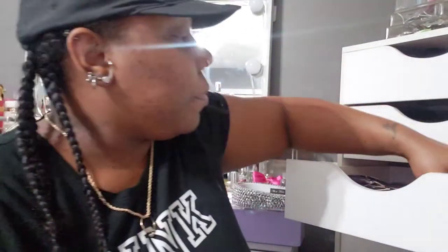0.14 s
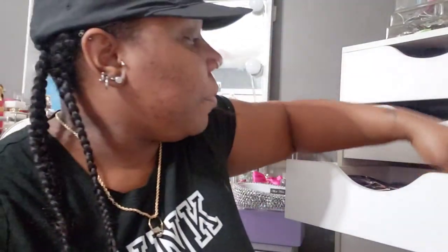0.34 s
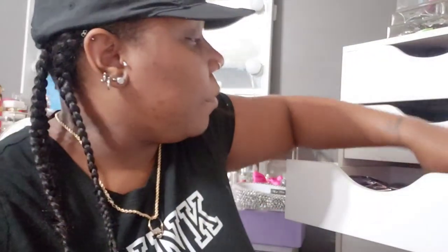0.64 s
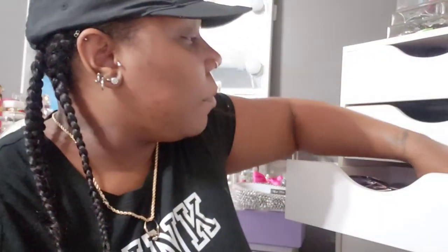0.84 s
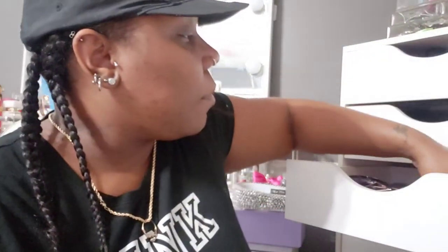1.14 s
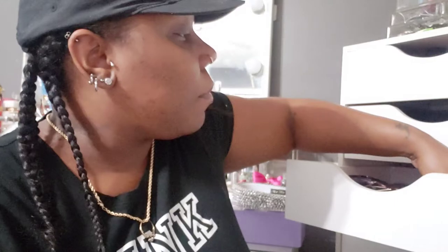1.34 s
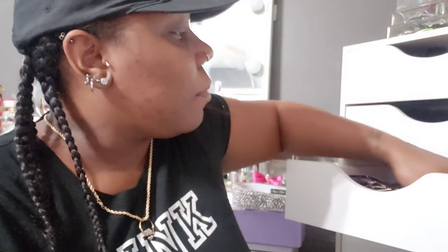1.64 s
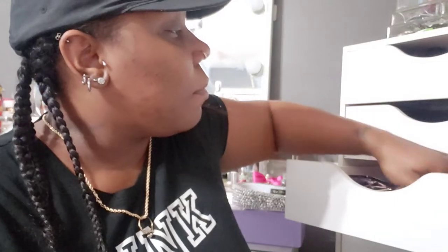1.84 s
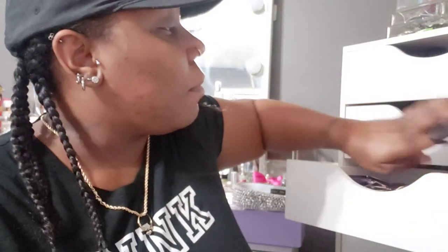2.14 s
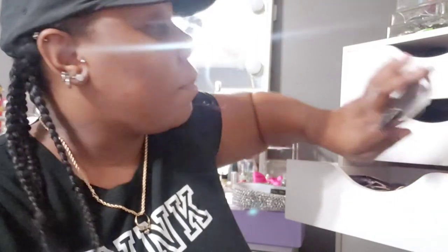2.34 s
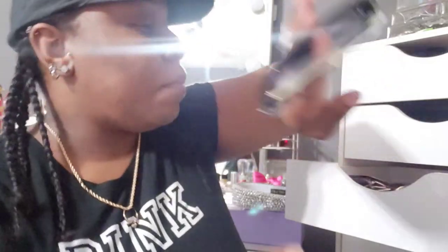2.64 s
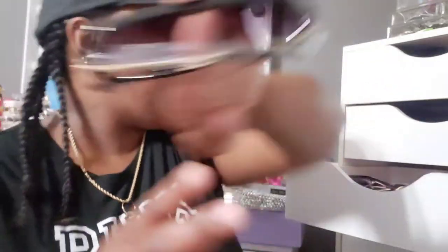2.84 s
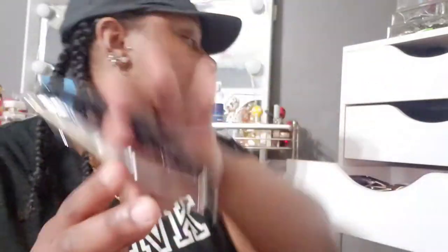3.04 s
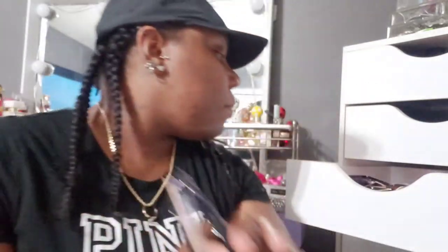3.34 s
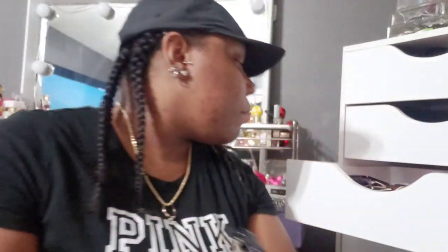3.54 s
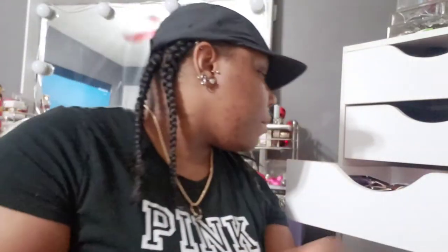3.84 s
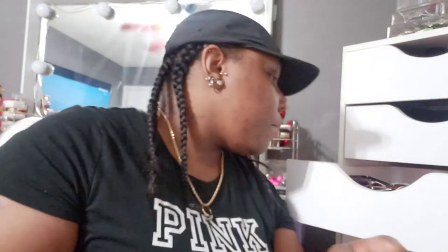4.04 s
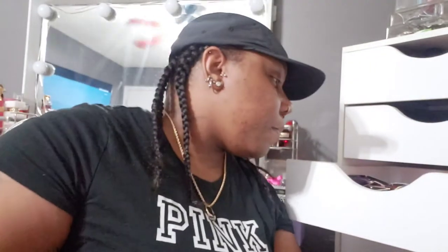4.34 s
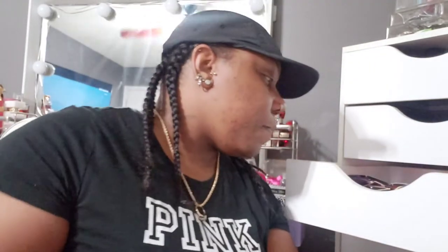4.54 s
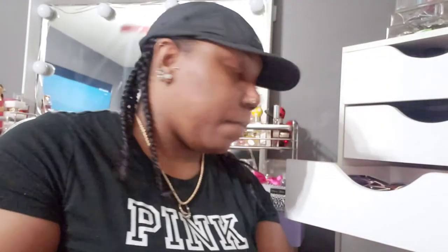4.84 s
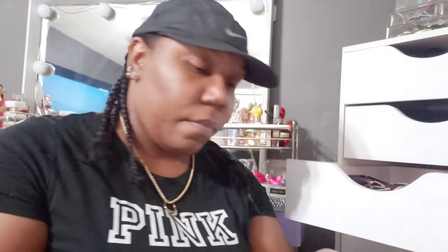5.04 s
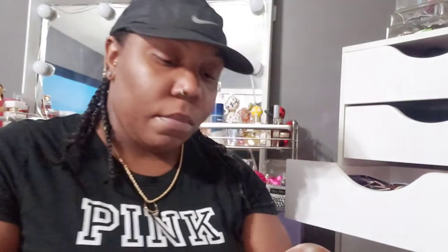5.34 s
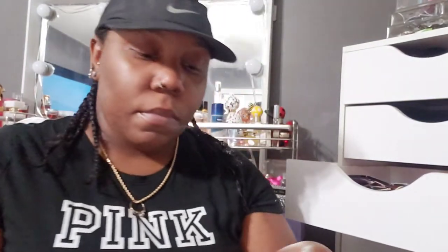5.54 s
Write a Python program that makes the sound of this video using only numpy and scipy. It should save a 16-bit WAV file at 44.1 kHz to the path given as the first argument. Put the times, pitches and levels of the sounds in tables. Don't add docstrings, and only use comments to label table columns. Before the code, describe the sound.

A hand rummages through plastic sunglasses in a hollow drawer, clattering and booming, then thin plastic wrap crackles close by over faint fan noise.

```python
import sys
import numpy as np
from scipy import signal
from scipy.io import wavfile

SR = 44100
rng = np.random.default_rng(int(sys.argv[2]) if len(sys.argv) > 2 else 0)


def generate_wav(signal):
    frames = np.transpose(np.atleast_2d(signal))
    scaled = np.clip(frames, -1, 1) * 32767
    pcm = np.round(scaled).astype(np.int16)
    wavfile.write(sys.argv[1], SR, pcm)


def voltage_ratio(decibels):
    exponent = np.asarray(decibels, float) / 20
    return 10 ** exponent


N = 250047


# start in seconds, frame click in dB,
# drawer boom in dB, mode struck most in Hz. First, lenses striking edge on.
LENS_KNOCKS = [(0.4339, -22.5, -22, 367), (0.4629, -47, -31.5, 393), (0.5449, -44, -41, 660),
               (1.0836, -47, -46.5, 1200), (1.465, -43.5, -35.5, 1180), (1.482, -35.5, -37, 356),
               (1.5164, -44.5, -40, 514), (1.7197, -56, -33.5, 750), (1.9049, -29.5, -30, 387),
               (2.1427, -28, -29, 1170), (2.3965, -81, -48.5, 890), (1.039, -51, -33, 1245),
               (1.064, -61, -29.5, 650), (0.441, -44, -31, 1245), (0.477, -42, -34, 380)]
TUMBLES = [(0.3206, -36, -35.5, 666), (0.3403, -31.5, -41, 684), (0.3544, -24.5, -27.5, 1220),
           (0.4206, -22, -23, 1270), (0.4276, -37, -48, 1370), (0.5142, -30.5, -37, 414),
           (1.0031, -36.5, -34.5, 370), (1.0203, -24.5, -30.5, 344), (1.2044, -49.5, -43.5, 665),
           (1.2753, -45, -39, 635), (1.2838, -33, -38, 445), (1.2984, -41, -34, 1300),
           (1.9144, -35.5, -31, 645), (1.9312, -28, -34.5, 367), (2.0582, -44, -38.5, 930)]
BUMPS = [(0.1547, -54.5, -52, 1390), (0.2327, -30.5, -25, 620), (0.2322, -44, -30.5, 1300),
         (1.108, -58, -50, 380), (1.309, -58, -43, 436), (0.363, -32.5, -40, 1340),
         (0.9086, -57, -43.5, 420), (0.9306, -45, -45, 1200), (0.9888, -43, -47, 1230),
         (1.0629, -35, -33.5, 1220), (1.1697, -38, -41.5, 706), (1.262, -37, -36.5, 1300),
         (1.6294, -44, -55, 557), (1.6876, -42.5, -44, 1180), (1.7107, -33, -42, 1360),
         (1.7951, -46.5, -45.5, 710), (2.0316, -37.5, -36.5, 445), (2.0374, -37, -47, 378)]
TAPS = [
    (1.368, -55, -66, 650),
    (1.3742, -58, -64, 650),
    (1.2, -58, -60, 1260),
    (1.5, -48, -41, 650),
    (1.085, -53.5, -60, 1260),
    (1.293, -54, -40, 1260),
    (1.723, -53.5, -46, 715),
    (0.4358, -40, -50, 1260),
]
# lens tick over frame click in dB, rattle in seconds, rise in seconds.
LENS_KIND = (-3, 0.0055, 0.0017)
TUMBLE_KIND = (-14, 0.0079, 0.0017)
BUMP_KIND = (-21, 0.0084, 0.0021)
TAP_KIND = (8.7, 0.0027, 0.0004)


def knocks():
    kinds = (LENS_KNOCKS, LENS_KIND), (TUMBLES, TUMBLE_KIND), (BUMPS, BUMP_KIND), (TAPS, TAP_KIND)
    return sorted(row + kind for rows, kind in kinds for row in rows)


def knock_shape(rattle_s, rise_s):
    t = np.arange(5000) / SR
    return np.exp(-t / rattle_s) * (1 - np.exp(-t / rise_s))


# pitch in Hz, width in Hz, level in dB.
DRAWER = [(200, 45, -12), (275, 60, -9), (382, 40, 1), (440, 50, -10), (650, 50, -1), (715, 55, -8),
          (900, 90, -5), (1094, 100, -8), (1262, 110, 0), (1430, 130, -8), (1740, 140, -10)]
# start in seconds, level in dB, pitch in Hz.
THUMPS = [
    (0.238, -44, 150),
    (0.366, -44.5, 142),
    (0.446, -45.5, 153),
    (0.749, -63.5, 117),
    (1.064, -47.5, 145),
    (1.098, -49, 150),
    (1.293, -55, 138),
    (1.911, -54.5, 122),
    (2.05, -49, 163),
    (2.147, -52.5, 130),
]
# moment in seconds, boom in dB, click in dB, hold in seconds.
DRAGS = [
    (0.28, -56, -68, 0.0083),
    (0.38, -40.5, -43.5, 0.0059),
    (0.5, -57, -92, 0.074),
    (1.07, -45, -61, 0.0031),
    (1.15, -59.5, -61, 0.033),
    (1.35, -67, -71.5, 0.33),
    (1.75, -67, -71, 0.26),
    (1.94, -51.5, -60, 0.0079),
    (2.09, -57, -66, 0.11),
    (2.22, -69, -64.5, 0.026),
]
DRAG_DB_PER_S = (199, 264)


def drawer_boom():
    low, t, contacts = np.zeros(N + 9000), np.arange(5000) / SR, grit(2500, 1.16)
    impulse = np.r_[1, np.zeros(2999)]
    rings = []
    for hz, width, db in DRAWER:
        ring = resonate(impulse, [(hz, width, db)])
        rings.append(resonate(ring, [(hz, 4.2 * width, 0)]))
    rings, mode_hz = np.array(rings), np.array(DRAWER)[:, 0]
    for s, _, boom_db, hz, _, rattle_s, rise_s in knocks():
        at = round(s * SR)
        shape = knock_shape(rattle_s, rise_s)
        near = 0.45 + np.exp(-(np.log(mode_hz / hz) / 0.2) ** 2)
        sign = rng.choice([-1, 1], len(DRAWER))
        blows = shape * contacts[at:at + 5000]
        blows[30] += 7.5
        boom = signal.fftconvolve(blows, (1 + 0.31 * sign) * near @ rings)
        low[at:at + 7999] += voltage_ratio(boom_db) * np.linalg.norm(shape) * unit(boom)
    for s, db, hz in THUMPS:
        swell = t / 0.0051 * np.exp(1 - t / 0.0078)
        low[round(s * SR):][:5000] += voltage_ratio(db) * np.sin(2 * np.pi * hz * t) * swell
    drag = swells(DRAGS, DRAG_DB_PER_S) * contacts
    return low[:N] + signal.oaconvolve(drag, unit(rings.sum(0)))[:N]


# frequency in Hz, level in dB per Hz.
FRAMES = [(710, -7.5), (1200, -7), (2400, -7), (3530, -10.5), (4820, -14.5), (7410, -23), (9000, -44),
          (11700, -78)]
# pitch in Hz, width in Hz, level in dB.
LENS = [(2040, 150, 4), (2570, 100, 7), (2880, 100, 7), (3440, 171, 0), (4850, 80, 7), (7400, 160, 9.5)]
# frequency in Hz, level in dB per Hz.
TICK = [(5000, 5.5), (8500, 2), (12000, 1), (15300, 2), (16000, -35)]


def frame_clatter():
    click = swells(DRAGS, DRAG_DB_PER_S, column=2)
    tick = 0.23 * click
    for s, click_db, _, _, tick_db, rattle_s, rise_s in knocks():
        at = round(s * SR)
        shape = knock_shape(rattle_s, rise_s)
        click[at:at + 5000] += voltage_ratio(click_db) * shape
        tick[at:at + 5000] += voltage_ratio(click_db + tick_db) * shape
    lens_ring = resonate(np.r_[1, np.zeros(1023)], LENS)
    shell = unit(unit(causal(FRAMES)) + 0.4 * lens_ring)
    high = voltage_ratio(-2.5) * signal.oaconvolve(click * grit(4000, 2.8), shell)[:N]
    high += voltage_ratio(4.0) * signal.oaconvolve(tick * grit(4000, 1.9), unit(causal(TICK)))[:N]
    return signal.lfilter(*signal.butter(3, 1500, "high", fs=SR), high)


# time in seconds, low rub in dB, squeak in dB.
SCUFF = [
    (0.746, -90, -90),
    (0.751, -63, -72),
    (0.765, -72, -66),
    (0.785, -72, -58.5),
    (0.81, -80, -70.5),
    (0.85, -86, -81),
    (0.9, -93, -82),
]
# pitch in Hz, width in Hz, level in dB.
SCUFF_BANDS = [(1980, 220, -1), (2900, 200, -1)]
SQUEAK_BANDS = [(3560, 184, -2), (4030, 200, -1), (4470, 200, -10)]


def floor_scuff():
    scuff = 0
    for column, bands in ((1, SCUFF_BANDS), (2, SQUEAK_BANDS)):
        grains = resonate(resonate(grit(3000, 3.0), bands), bands)
        scuff = scuff + curve(SCUFF, column) * evened(grains)
    return scuff


def drawer():
    boom = room(voltage_ratio(3.0) * drawer_boom(), -10.0, lag=9.7, pan_db=-2.0)
    return boom + room(frame_clatter() + voltage_ratio(4.0) * floor_scuff(), -3.5, lag=6.6, pan_db=2.0)


# frequency in Hz, level in dB per Hz.
FILM = [(880, -29), (1500, -47), (2200, -1), (2970, 3), (3310, 3), (4920, 1), (7240, 5.5), (8740, -2),
        (13300, 3.5), (15500, 2), (16200, -35)]
# start in seconds, peak in dB, crease pitch in Hz,
# wide facet in dB over the pop.
POPS = [(3.5316, -62, 7400, -18), (3.5528, -56, 11400, -23), (3.564, -58, 7460, -21),
        (3.624, -52, 10900, -28), (3.664, -41, 7460, -32), (3.7401, -39, 7240, -32),
        (3.7593, -28, 7260, -12), (3.8505, -37, 7700, -15), (3.8676, -49, 8660, -21),
        (3.9718, -34, 6940, -32), (4.003, -54, 7120, -12), (4.0754, -56, 7230, -18),
        (4.084, -50, 7480, -12), (4.1092, -47, 7470, -9), (4.485, -51, 6700, -14), (4.603, -54, 7600, -23),
        (4.805, -43, 11300, -22), (4.8307, -40, 11000, -23), (4.872, -47, 7320, -21),
        (4.885, -33, 8500, -12), (4.924, -37.5, 7440, -10.5), (4.9618, -40.5, 12000, -20),
        (4.9847, -33.5, 6600, -18), (5.016, -35.5, 5300, -5.5), (5.0652, -43, 7400, -25),
        (5.079, -40, 7080, -16), (5.1895, -25.5, 6500, -23), (5.166, -41, 6960, -13),
        (3.815, -55, 7000, -15), (3.883, -45, 7400, -13), (3.9, -53, 7100, -3), (4.0566, -58.5, 7620, -22),
        (4.218, -45, 11500, -12), (4.233, -57, 6500, 4), (4.31, -57, 7200, -19), (4.463, -54, 13000, -18),
        (4.655, -60.5, 7000, 3), (4.7992, -45, 6800, -4), (5.1174, -54, 6410, -8),
        (5.1508, -48, 11600, -18), (5.292, -45, 5000, 1), (5.426, -48, 7000, -2), (5.461, -46, 7000, -10),
        (5.56, -43, 6500, -6), (5.582, -52, 6460, -8), (5.589, -45, 6900, -8), (5.657, -48, 7400, -8),
        (5.213, -36, 6800, -16), (3.7765, -55, 7000, -12), (3.951, -56, 7000, -8)]
FOLDS = [(3.3202, -57.5, 7500, -10), (3.753, -36.5, 6810, -18), (3.7964, -35, 7400, -11.5),
         (3.8788, -48, 7600, -11), (3.9252, -47, 7130, -10), (3.939, -45, 6660, -8),
         (4.1321, -42, 6400, -5), (4.151, -38, 7160, 1), (4.164, -38, 11500, -8), (4.175, -48, 11300, 2),
         (4.21, -49, 12400, -4), (4.2526, -40.5, 6100, -14), (4.2992, -37.5, 5000, -8),
         (4.3253, -28.5, 12400, -5), (4.3866, -30.5, 7040, -6.5), (4.5735, -39.5, 7700, -10.5),
         (4.7545, -39, 7400, -3), (4.773, -42, 7400, -5), (4.843, -37.5, 12300, -21),
         (5.1788, -26.5, 11800, -18), (5.2055, -28, 6800, -10), (5.2589, -39.5, 12300, -12),
         (5.3401, -36, 7260, -13.5), (5.3454, -35.5, 6660, -13), (5.4177, -45, 6840, -6),
         (5.45, -41.5, 6700, -24), (5.5639, -34.5, 5600, -7.5), (5.5922, -39, 5000, -40),
         (5.624, -44, 6600, -16), (5.6624, -36, 7440, -8)]


def crease_snaps(film):
    out, t = np.zeros((2, N + 2000)), np.arange(1500) / SR
    snaps = sorted([row + (-71,) for row in POPS] + [row + (-50.5,) for row in FOLDS])
    crackle = np.exp(-t / 0.006) * (1 - np.exp(-t / 0.00065))
    late = np.maximum(t - 0.00065, 0) / 0.00022
    pop = late * np.exp(1 - late)
    edge = signal.butter(3, 5500, "high", fs=SR, output="sos")
    for s, db, hz, facet_db, thud_db in snaps:
        thud_db += facet_db + 0.66 * (db + 36.5) - db
        crackle_db = -15 - 0.22 * (db + 19.0)
        both, left, right = rng.standard_normal((3, 1500))
        ticks = voltage_ratio(3.2 * rng.exponential(1, 30) - 4.5).repeat(50)
        noise = 0.96 * both + 2.03 * np.array([left, right])
        noise = unit(pop * noise) * 6.16 + voltage_ratio(crackle_db) * noise * crackle * ticks
        burst = signal.sosfilt(edge, signal.fftconvolve(noise, film[None], axes=1)[:, :1500])
        burst += voltage_ratio(facet_db) * resonate(noise, [(3050, 710, 10.2), (4650, 450, 7.9)])
        crease = resonate(noise, [(hz, 0.11 * hz, 4.0)])
        thud = voltage_ratio(thud_db) * resonate(noise, [(1220, 140, 24.3), (2310, 830, 21.6)])
        at = round((s - 0.0002) * SR)
        out[:, at:at + 1500] += voltage_ratio(db - 2.0) * (burst + crease + thud)
    return out[:, :N]


# moment in seconds, level in dB, hold in seconds.
SQUEEZES = [(3.335, -67.5, 0.0044), (3.45, -74, .1), (3.62, -63.5, 0.017), (3.8, -68, .03),
            (3.92, -63.5, 0.014), (4.17, -49, 0.0054), (4.31, -58.5, 0.17), (4.61, -60.5, 0.011),
            (4.86, -56, 0.034), (5.05, -55.5, 0.033), (5.2, -50, 0.0027), (5.4, -54, 0.19)]
SQUEEZE_DB_PER_S = (220, 174)
FLURRIES = [(3.768, -56, 0.0066), (3.882, -61, 0.0027), (3.935, -59, 0.011), (3.98, -65, .004),
            (4.17, -63, 0.009), (4.215, -71, 0.0046), (4.258, -59, .004), (4.305, -57, 0.0081),
            (4.335, -65, .006), (4.395, -55, .004), (4.78, -53, 0.0065), (4.9, -51, .012),
            (4.97, -55, .005), (5.075, -63, .012), (5.19, -54.5, 0.0063), (5.215, -50, 0.011),
            (5.35, -60, .006), (5.57, -52, 0.0055)]
FLURRY_DB_PER_S = (2500, 700)
# time in seconds, level in dB.
HANDS = [
    (3.7, -71),
    (4.176, -77),
    (4.286, -64.5),
    (4.626, -72.5),
    (5.142, -72),
    (5.258, -64),
    (5.4, -61.5),
    (5.67, -62.5),
]
# time in seconds, level in dB.
SWISH = [
    (2.52, -97),
    (2.56, -74.5),
    (2.908, -70),
    (3.124, -79),
    (3.16, -96),
]


def fine_crinkle(film):
    clumps = voltage_ratio(2.9 * slow(500))
    crinkle = 0
    for hz in (3270, 5000, 7500, 10400, 13400):
        crinkle = crinkle + resonate(grit(450, 3.0) * clumps, [(hz, 0.39 * hz, 0)])
    crinkle = evened(signal.oaconvolve(crinkle, film)[:N])
    rustle = evened(resonate(grit(1400, 0.98) * clumps, [(1200, 300, -3), (2440, 570, 13.0)]))
    rub = evened(resonate(grit(3000, 1.4), [(744, 510, 0.5), (895, 1200, -2.0)]))
    swish = signal.oaconvolve(rng.standard_normal(N), film)[:N]
    swish = resonate(swish, [(5000, 9300, 0.0062)])
    press = curve(HANDS)
    fine = (swells(SQUEEZES, SQUEEZE_DB_PER_S) + swells(FLURRIES, FLURRY_DB_PER_S)) * crinkle
    fine += 0.79 * press * rustle
    fine += voltage_ratio(-64) * (press / voltage_ratio(-63)) ** 2.4 * rub
    return fine + 0.8 * curve(SWISH) * swish


def wrapper():
    film = unit(causal(FILM))
    return room(crease_snaps(film) + voltage_ratio(-1.5) * fine_crinkle(film), -9.0, lag=2, pan_db=1.0)


# frequency in Hz, level in dB per Hz.
AIR = [(47, -37), (80, -3.5), (140, -11), (227, -13.5), (461, -11), (550, -10.5), (734, -19.5),
       (1050, -16.5), (1200, -13), (1530, -16.5), (3470, -32), (7360, -33.5), (8600, -45.5), (11500, -33.5),
       (15400, -30.5), (16000, -59)]
# frequency in Hz, tilt in dB, half of it applied to the left port.
LEAN = [(60, 11), (200, -9.5), (380, 2.5), (700, 11.5), (1300, -7.5), (8000, 5.5), (15000, -18)]


def air_wash():
    wash = pair(N, lambda hz, s: read(AIR, hz) + 0 * s, size=1024)
    top = signal.sosfilt(signal.butter(4, 700, "high", fs=SR, output="sos"), wash.mean(0))
    wash = voltage_ratio(-72.5) * wash / top.std()
    points = [(0, 1)] + [(2 * hz / SR, voltage_ratio(db / 2)) for hz, db in LEAN] + [(1, 1)]
    lean = signal.firwin2(1025, *zip(*points))
    return np.array([signal.oaconvolve(wash[0], lean, "same"), wash[1] * 0.7])


# shaft order, level in dB.
FAN = [(15, -79), (21, -82), (22, -71), (23, -71), (24, -81), (25, -84), (49, -81), (54, -77), (78, -82)]


def shaft_tones():
    shaft_hz = 24.0 * (1 + 0.001 * slow(7.1))
    turns = np.cumsum(shaft_hz) / SR
    tones = np.zeros((2, N))
    for order, db in FAN:
        start = 0.37 * rng.random()
        apart = np.array([[0], [order * 0.0082]])
        level = np.sqrt(2) * voltage_ratio(db + 3.2 * slow(90.0))
        tones += level * np.cos(2 * np.pi * (order * turns + start - apart))
    return tones * voltage_ratio([[2.2], [-2.2]])


# moment in seconds, level in dB, hold in seconds.
SWELLS = [(0.45, -66, 0.16), (0.74, -61.5, 0.029), (1.08, -60, 0.033), (2.02, -59.5, 0.039),
          (2.45, -68.5, 0.14), (2.84, -60.5, 0.0084), (3.24, -56, .01), (3.85, -69, 0.066),
          (4.14, -59, .01), (4.49, -62.5, 0.016), (5.22, -70, 0.09), (5.56, -66, 0.018), (0.1, -83, .05),
          (1.35, -64.5, 0.037), (1.6, -70, 0.025), (3.05, -70, .03), (4.75, -69, 0.028)]
SWELL_DB_PER_S = (122, 86)


def low_hum():
    level = np.minimum(swells(SWELLS, SWELL_DB_PER_S), voltage_ratio(-59))
    turns = np.cumsum(59.5 + 2.5 * slow(40.0)) / SR
    hum = level * np.sqrt(2) * np.cos(2 * np.pi * turns)
    deep = pair(N, lambda hz, s: -30 * abs(np.log2((hz + 1) / 60)) + 0 * s, size=4096)
    deep = resonate(deep, [(41.0, 12, 2.0), (55.7, 32, -17.5), (94.6, 18, -6.0)])
    return (hum * np.array([[1], [0.8]]) + voltage_ratio(-73.0) * evened(deep)) * voltage_ratio([[0.4], [-0.4]])


def fan():
    return air_wash() + shaft_tones() + low_hum()


# frequency in Hz, 60 dB decay time in seconds.
ROOM = [(100, 0.59), (400, 0.2), (1500, 0.18), (5000, 0.2), (14000, 0.16)]


def room(x, wet_db, lag=0, pan_db=3.0):
    x = x * np.ones((2, 1))
    out = np.array([x[0], 0.53 * np.roll(x[1], round(lag))])
    length = SR // 3
    for k in range(3):
        tail = pair(length, lambda hz, s: -60 * s / read(ROOM, hz), size=256)
        tail *= np.minimum(np.arange(length) / (0.001 * SR), 1) ** 2
        tail *= voltage_ratio(wet_db) / np.linalg.norm(tail[0])
        turn = np.sqrt(2 / 3) * np.cos(np.pi * (np.arange(N) / SR / 0.05 + k / 3))
        out += signal.oaconvolve(x * turn, tail, axes=1)[:, :N]
    return out * voltage_ratio(np.array([[0.5], [-0.5]]) * pan_db)


# frequency in Hz, likeness from -1 to 1.
SAME = [(30, 0.68), (60, 0.73), (130, 0.9), (290, 0.9), (640, 0.5), (1410, -0.2), (3100, 0.24),
        (6820, -0.16), (15000, 0.083)]


def pair(length, shape_db, size=512):
    frames, hz = 4 * length // size + 5, np.fft.rfftfreq(size, 1 / SR)[:, None]
    a, b, c, d = rng.standard_normal((frames, len(hz), 4)).T
    same = np.clip(read(SAME, hz), -1, 1)
    left = a + 1j * b
    right = same * left + np.sqrt(1 - same ** 2) * (c + 1j * d)
    z = np.array([left, right]) * voltage_ratio(shape_db(hz, np.arange(frames) * size / 4 / SR))
    return signal.istft(z, nperseg=size, noverlap=3 * size // 4)[1][:, :length]


def grit(per_s, spread_db):
    size = voltage_ratio(spread_db * np.minimum(rng.exponential(1, N), 4)) * rng.choice([-1, 1], N)
    return evened(size * (rng.random(N) < per_s / SR))


def slow(hz):
    pole = 1 - hz / SR
    return evened(signal.lfilter([1], [1, -2 * pole, pole ** 2], rng.standard_normal(N)))


def resonate(x, modes):
    out = 0
    for k, (hz, width, db) in enumerate(modes):
        out = out + (-1) ** k * voltage_ratio(db) * signal.lfilter(*signal.iirpeak(hz, hz / width, SR), x)
    return out


def causal(points):
    level_db = np.maximum(read(points, abs(np.fft.fftfreq(2048, 1 / SR))), -60)
    log_gain = np.log(voltage_ratio(level_db))
    return np.fft.ifft(np.exp(log_gain - 1j * signal.hilbert(log_gain).imag)).real[:1024]


def read(points, hz):
    f, value = np.transpose(points)
    return np.interp(np.log(hz + 1), np.log(f + 1), value)


def curve(rows, column=1):
    rows = np.array(rows)
    return voltage_ratio(np.interp(np.arange(N) / SR, rows[:, 0], rows[:, column], -120, -120))


def swells(rows, db_per_s, column=1):
    t, power = np.arange(0, N + 64, 64) / SR, 0
    rise, fall = db_per_s
    for row in rows:
        middle, hold = row[0], row[-1]
        before = np.maximum(middle - hold - t, 0)
        after = np.maximum(t - middle - hold, 0)
        power = power + voltage_ratio(2 * (row[column] - rise * before - fall * after))
    return np.interp(np.arange(N) / SR, t, np.sqrt(power))


def evened(x):
    return x / np.sqrt(np.mean(x ** 2) + 1e-20)


def unit(x):
    return x / np.linalg.norm(x)


def scene():
    return drawer() + wrapper() + fan()


def top_cut(x):
    return signal.sosfilt(signal.butter(12, 16810, fs=SR, output="sos"), x)


def record(dry):
    limited = signal.oaconvolve(dry, signal.firwin(255, 16300, fs=SR)[None], "same")
    return top_cut(limited)


dry = scene()
out = record(dry)
generate_wav(out)
```